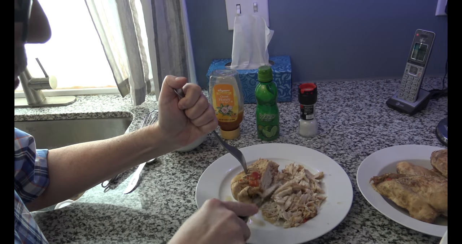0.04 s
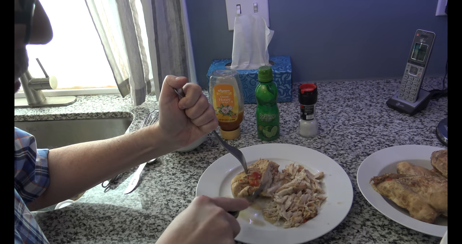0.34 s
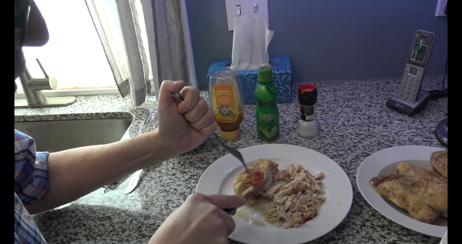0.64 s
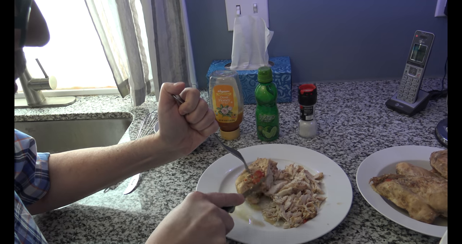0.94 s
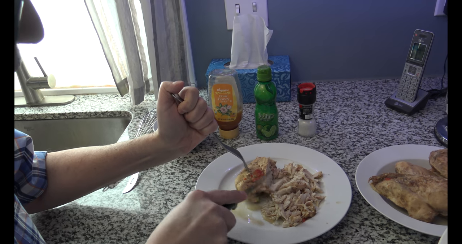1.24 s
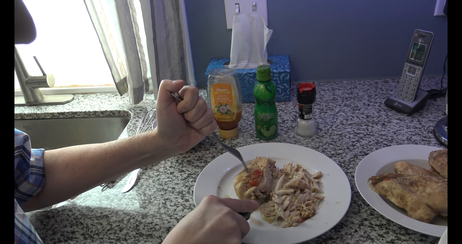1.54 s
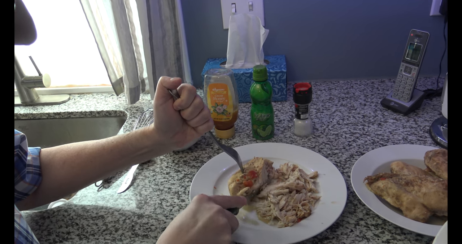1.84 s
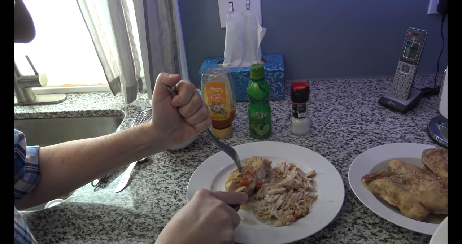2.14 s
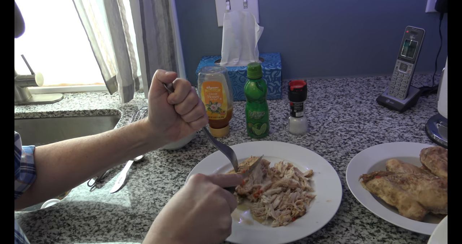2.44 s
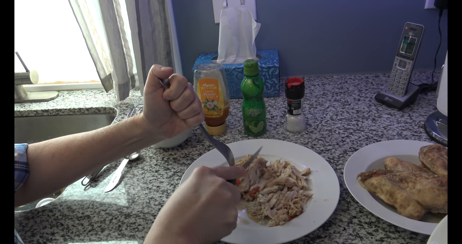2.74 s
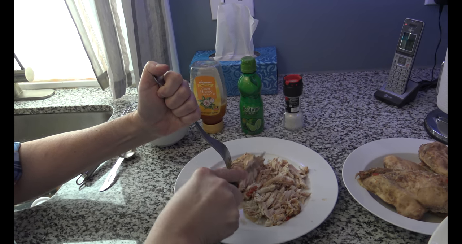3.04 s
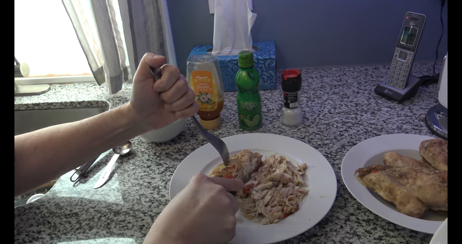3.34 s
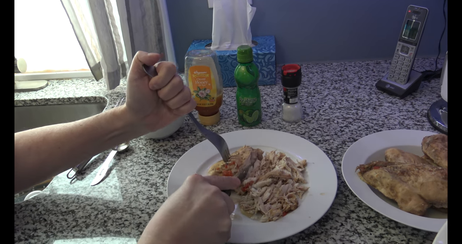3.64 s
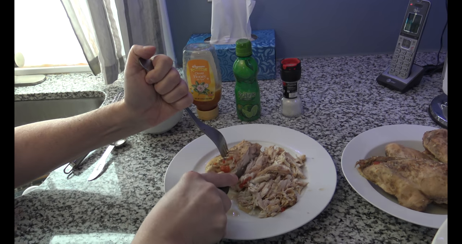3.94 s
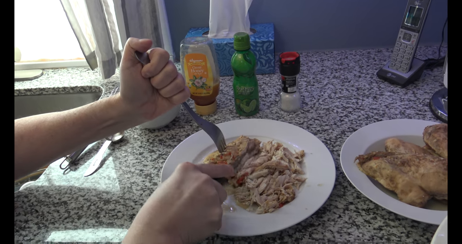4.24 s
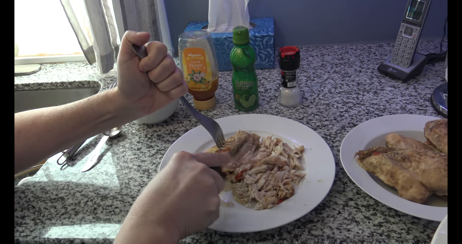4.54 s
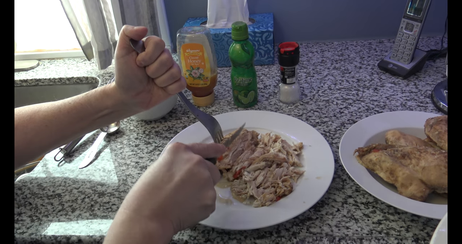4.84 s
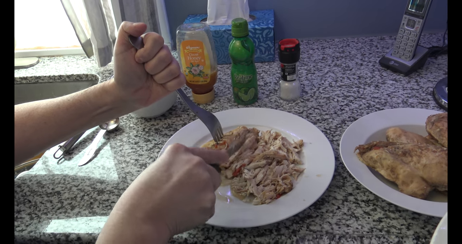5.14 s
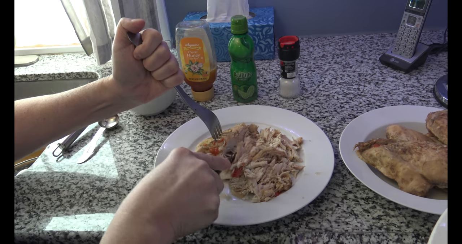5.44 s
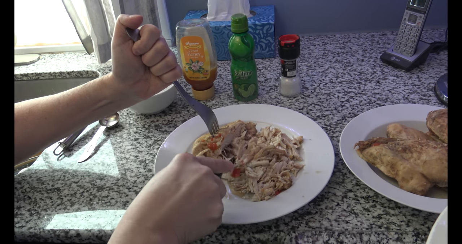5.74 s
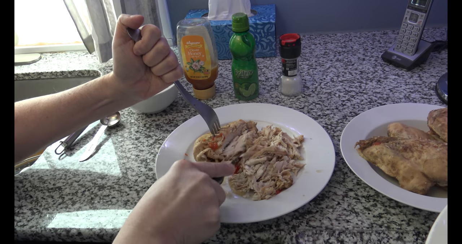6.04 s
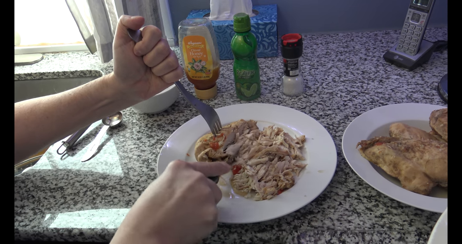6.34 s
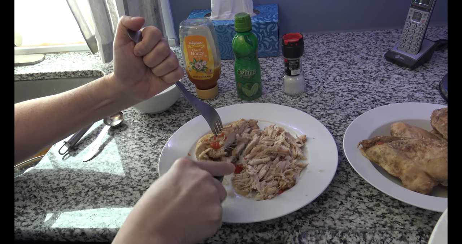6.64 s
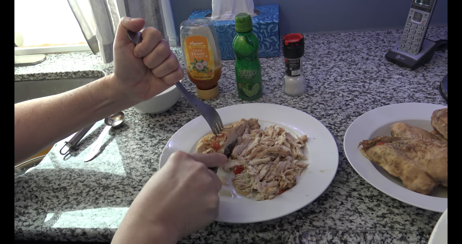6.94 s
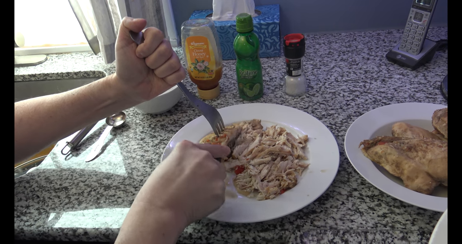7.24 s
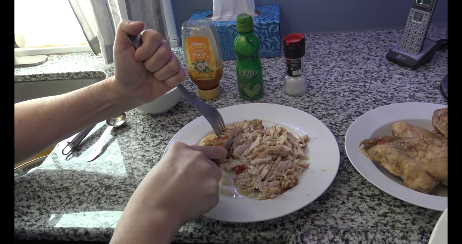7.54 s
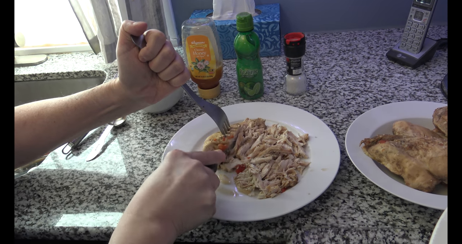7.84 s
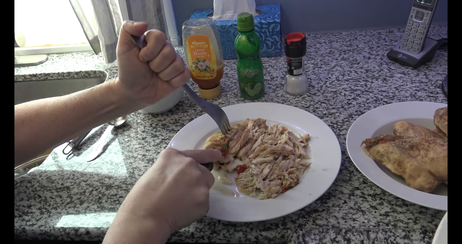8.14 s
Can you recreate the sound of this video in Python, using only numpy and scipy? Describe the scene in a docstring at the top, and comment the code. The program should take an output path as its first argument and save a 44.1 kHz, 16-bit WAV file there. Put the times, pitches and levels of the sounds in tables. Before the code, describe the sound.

Two steel forks clink and scrape on a china plate while pulling cooked chicken apart with a wet crackle, in a small kitchen.

```python
"""Sharp clinks, scrapes and a wet crackle: two steel forks pull cooked chicken apart on a china plate.
The fork tips ring as they hit the glaze, rasp as they slide, and once stick and slip in a squeal.
The meat tears in many tiny pops, and the plate knocks dully on the stone kitchen counter.
The small hard room echoes, with a few soft booms from leaning arms, a faint hiss and a low rumble."""
import sys
import numpy as np
from scipy import signal
from scipy.fft import rfft, irfft
from scipy.io import wavfile

SR = 44100
rng = np.random.default_rng(int(sys.argv[2]) if len(sys.argv) > 2 else 0)


def unload_wav(signal):
    """Save mono or channel-first audio to the path in sys.argv[1] as 16-bit WAV at rate SR, clipped to [-1, 1]."""
    wavfile.write(
        sys.argv[1],
        SR,
        np.round(np.clip(np.atleast_2d(signal).T, -1, 1) * 32767).astype(np.int16),
    )


N = 360914

# How the plate rings on the counter. Each row: pitch in Hz, width in Hz (wider dies sooner), level in dB.
PLATE_RINGS = [(192, 190, -12.5), (315, 90, -6.5), (459.3, 38, 1.5), (680, 100, -10.5), (948, 132, -4.5),
               (1216, 110, -5), (1310, 65, -11), (1700, 160, -13), (2050, 310, -18)]


def clinks(chatter=0.22, chatter_s=0.005, crack=0.03):
    """A fork tip lands and chatters briefly. Returns the direct sound and the part sent to the room."""
    # Each row: start in seconds, level in dB, pulling fork's share from 0 to 1, treble in dB,
    # relative echo level in dB.
    hits = [(0.1194, -26.5, 0, -3, -5), (0.4513, -17, 0.02, 0.5, -9.5), (.5327, -31, 0.1, 4, -21),
            (0.7553, -31.5, 0, 1, -7.5), (1.0614, -11, 0, 0.5, -6), (1.4126, -34.5, 0.27, 5.5, -2.5),
            (1.8383, -16.5, 0.05, 1.5, -13), (2.1948, -31, 0.5, -4, -11), (2.5851, -11.5, 0.77, 1, -7.5),
            (2.9205, -11.5, 0.63, 3, -4.5), (3.278, -13.5, 0.72, 4, -9), (5.7899, -22, 0.54, -6.5, -13),
            (6.0125, -27.5, 0.1, -11.5, -6.5), (6.3567, -31, 0.13, -8, -12),
            (6.6424, -21.5, 0.38, -2.5, -11), (6.9636, -39, 0.7, -15, -12), (7.4523, -27, 1, -29, -3.5),
            (7.4682, -28, 0.74, -18, -10.5), (7.7126, -26.5, 0.4, -21, -8), (7.8004, -23.5, 0.94, -36, 0),
            (7.9265, -28, 0.84, -28, -12)]
    direct, to_room, t = np.zeros(N), np.zeros(N), np.arange(SR // 8) / SR
    for start, db, pulling, treble_db, room_db in hits:
        force = (t == 0) + chatter * rng.standard_normal(len(t)) * np.exp(-t / chatter_s)
        clink = fork_ring(force, pulling, treble_db) + crack * treble(cut(force, 700, "high"), treble_db)
        top_hz = 16000 * amp(0.47 * (db + 2.5) / 3)   # a lighter blow touches longer and sounds duller
        clink = set_hit_level(cut(clink, top_hz, "low", order=3), db)
        add(direct, start, clink)
        add(to_room, start, amp(room_db - 3) * clink)
    return direct, to_room


def fork_ring(force, pulling, treble_db, damping=1, corner_hz=4600):
    """A touch rings fork and plate; each spot on the plate sounds a little different."""
    # Steel on china. Each row: pitch in Hz, width in Hz, dB for the holding fork, dB for the pulling fork.
    steel_rings = [(1453, 159, 3.5, -4.5), (1932, 313, -1.5, 0), (2783, 480, -8, -2.5), (3599, 59, 10, -3),
                   (4080, 370, -14, -5), (5846, 210, 0, -3.5), (6230, 200, -5, -10), (7380, 400, -11.5, -9),
                   (7900, 430, -8.5, -3.5), (8610, 550, -5.5, -4), (9940, 150, -8, -12),
                   (10500, 310, -13.5, -16), (11580, 420, -14.5, -14.5), (12800, 600, -9.5, -14.5),
                   (13550, 310, -18.5, -16), (15100, 580, -24, -18)]
    hz, width, holding_db, pulling_db = np.transpose(steel_rings)
    spot_db = 0.3 * rng.standard_normal(len(hz))
    db = holding_db + np.clip(pulling, 0, 1) * (pulling_db - holding_db) + spot_db
    ringing = resonate(force, zip(hz, width, db), damping)
    return treble(cut(ringing, 880, "high", order=3), treble_db, corner_hz)


def scrapes(lift_s=.023, damping=.7):
    """Tiny slips on the glaze swell as the fork presses down and fade as it lifts."""
    # Each row: time of the peak in seconds, rise time in seconds, relative level in dB,
    # pulling fork's share from 0 to 1, treble in dB.
    slides = [(.16, .025, -37, 0.4, -1), (.53, 0.026, -33, .44, -12), (1.374, 0.026, -43.5, 0.2, -4),
              (1.601, 0.038, -24, 0, 0.5), (2.343, 0.04, -21.5, 0.26, 3), (3.42, 0.08, -36, 0.5, 6),
              (3.56, 0.072, -37, 0.45, -18), (3.958, 0.022, -43, 0.1, -7), (4.087, 0.087, -29, 0.65, 2),
              (4.736, 0.068, -31.5, 0.57, 9), (5.445, 0.065, -40, 0.7, -17), (5.52, .013, -44.5, 1, -17),
              (5.77, .14, -34.5, 0.58, -2.5), (5.787, .016, -24, 0.65, 2), (6.066, 0.073, -29.5, 0.43, 2.5),
              (6.097, .034, -29.5, 0.53, -5.5), (7.376, .014, -37.5, .4, -17), (7.718, .027, -26, .94, -23),
              (7.842, .028, -30.5, 0.3, -4)]
    out = np.zeros(N)
    for peak, rise, db, pulling, treble_db in slides:
        t = np.arange(-2 * rise, 2 * lift_s, 1 / SR)
        slips = clicks(len(t), per_s=3600, spread_db=1.5) * amp(3 * waver(len(t), 150))
        pressure = amp(-17 * np.maximum(-t / rise, t / lift_s) ** 1.68)
        # bare tips brighten only the very top; meat on them dulls all but the lowest tones
        steel = fork_ring(slips, pulling, treble_db, damping, corner_hz=7000 if treble_db > 0 else 4400)
        plate = cut(resonate(slips, PLATE_RINGS, damping), 600, "low")
        rasp = cut(steel, 9800, "low", order=3) + amp(-7) * plate
        add(out, peak + t[0], amp(db - 2.5) * pressure * unit(rasp))
    return out


def tearing_meat(thin_snap_s=0.0026, thick_snap_s=0.0057):
    """Wet fibres part in clumps of tiny pops, with louder snaps and a soft squelch through the plate."""
    # A fork drags through meat. Each row: start and length in seconds, relative level and swell in dB.
    tears = [(0.704, 0.049, -52, 4), (1.035, 0.014, -38, 4), (1.374, 0.044, -49, 14.5),
             (1.778, 0.019, -52, 7), (2.121, 0.084, -48.5, 4), (2.528, 0.026, -59.5, 2),
             (2.873, 0.04, -49.5, 24), (3.209, 0.042, -54, 14), (3.585, 0.2, -59.5, 1.5),
             (3.905, 0.056, -53.5, 9.5), (4.235, 0.18, -53.5, -6), (4.573, 0.063, -49, 17.5),
             (4.917, 0.28, -52.5, -4.5), (5.29, 0.24, -53, -2.5), (6.302, 0.057, -44, -7),
             (6.382, 0.082, -56.5, -3), (6.593, 0.032, -44.5, -9), (6.9, 0.043, -46, 4),
             (7.0, 0.044, -52.5, 1), (7.201, .19, -50.5, -5.5), (7.511, 0.044, -39.5, 0),
             (7.608, 0.12, -47, 2), (7.883, .1, -49.5, -2), (8.121, 0.077, -44, 5)]
    # The thickest fibres break. Each row: start in seconds, relative level in dB.
    thick_snaps = [(.412, -32.5), (0.7419, -32.5), (1.8123, -21.5), (2.158, -20.5), (2.183, -27.5),
                   (3.5888, -27.5), (4.6403, -18), (5.4712, -27), (5.6477, -20.5), (6.598, -29),
                   (6.9358, -16.5), (7.5229, -24), (7.5514, -18), (8.1247, -18.5), (8.1703, -22.5)]
    # The tone of the crackle. Each row: frequency in Hz, relative level in dB.
    crackle_tone = [(410, -29), (700, -6), (1460, -6.5), (3320, -5.5), (3600, -7), (7890, -4), (10500, -12),
                    (13700, -10.5), (16000, -26)]
    pull = np.zeros(N)
    for start, length, db, swell_db in tears:
        _, envelope = stroke(length, swell_db, attack_s=.01, release_s=.011)
        add(pull, start, amp(db - 1) * envelope)
    pops = unit(sum(resonate(clicks(N, per_s=420, spread_db=3.6), [(hz, hz / 7, 0)])
                    for hz in np.geomspace(1000, 15000, 16)))
    t = np.arange(SR // 40) / SR
    thin_fades = signal.fftconvolve(clicks(N, per_s=36, spread_db=1), np.exp(-t / thin_snap_s))[:N]
    thin_snaps = unit(thin_fades * rng.standard_normal(N))
    clumps = amp(3 * waver(N, 49) + 1.2 * waver(N, 14))
    force = pull * (unit(pops * clumps) + amp(-9) * thin_snaps)
    for start, db in thick_snaps:
        add(force, start, amp(db - 11) * rng.standard_normal(len(t)) * np.exp(-t / thick_snap_s))
    crackle = cut(shape_tone(force, crackle_tone), 500, "high")
    squelch = cut(resonate(force, PLATE_RINGS), 650, "low")
    return crackle + amp(4) * squelch


def squeal():
    """A fork tip sticks and slips. When rough, every other slip differs, adding a tone an octave down."""
    # Each row: start and length in seconds, relative level and swell in dB, pitch and glide in Hz,
    # roughness from 0 to 1.
    squeaks = [(7.691, 0.091, -34, -5, 1850, -230, 0.67), (7.798, 0.064, -25.5, -2.5, 1652, 160, 0.82),
               (7.866, 0.016, -7, -7, 1884, -34, .02), (7.885, 0.075, -32.5, -14, 1902, -21, 0.17)]
    out = np.zeros(N)
    for start, length, db, swell_db, hz, glide_hz, rough in squeaks:
        t, envelope = stroke(length, swell_db, attack_s=.004, release_s=.003)
        wobble = 0.027 * (rough + 0.12) * waver(len(t), 670) + 0.017 * rough * waver(len(t), 50)
        pitch = (hz + glide_hz * np.minimum(t / length, 1)) * (1 + wobble)
        phase = 2 * np.pi * np.cumsum(pitch) / SR
        # Each pair: multiple of the pitch, strength.
        partials = [(.5, rough * amp(-5)), (1, 1), (1.5, rough * amp(-4.5)), (2, amp(-32))]
        tone = sum(gain * amp(3 * rough * waver(len(t), 40)) * np.sin(k * phase) for k, gain in partials)
        judder_db = 5 * rough * waver(len(t), 220)
        add(out, start, np.sqrt(2) * amp(db - 2 + judder_db) * envelope * tone)
    return out


def plate_knocks(rattle_rise_s=0.0012, rattle_fade_s=0.0095):
    """The plate tips onto the ring under its base: a soft landing, then a brief rattle."""
    # Each row: start in seconds, level in dB.
    landings = [(.118, -31), (.442, -33.5), (1.063, -39), (1.838, -42.5), (2.159, -34), (2.43, -45.5),
                (2.564, -40.5), (2.924, -31.5), (3.156, -37.5), (3.279, -34), (3.534, -40), (3.563, -36.5),
                (5.973, -49.5), (6.261, -36), (6.618, -40.5), (7.291, -38.5), (7.325, -33), (7.454, -35),
                (7.473, -32.5), (7.556, -29), (7.699, -38), (7.802, -34), (7.925, -30)]
    out, t = np.zeros(N), np.arange(SR // 5) / SR
    envelope = (1 - np.exp(-t / rattle_rise_s)) * np.exp(-t / rattle_fade_s)
    for start, db in landings:
        rattle = 0.23 * rng.standard_normal(len(t)) * envelope
        knock = resonate(2 * (t == 0) + rattle, PLATE_RINGS, damping=.9)
        add(out, start, set_hit_level(cut(knock, 2300, "low", order=3), db))
    return out


def counter_booms(swell_s=0.041, width_hz=22):
    """Arms lean on the counter, and the slow push makes it boom briefly."""
    # Each row: time of the peak in seconds, level in dB, pitch in Hz.
    leans = [(4.736, -34.5, 58), (5.211, -39.5, 60.4), (8.16, -31.5, 29.8)]
    out, t = np.zeros(N), np.arange(-SR // 4, SR // 4) / SR
    for peak, db, hz in leans:
        boom = unit(cut(resonate(rng.standard_normal(len(t)), [(hz, width_hz, 0)]), 123, "low"))
        add(out, peak + t[0], amp(db) * boom * np.exp(-(t / swell_s) ** 2))
    return out


def kitchen_echo(x, build_s=0.0041):
    """Reflections from the hard room build up quickly, and the high ones die first."""
    # Each row: frequency in Hz, seconds the echo takes to fade by 60 dB.
    fade_times = [(200, 1), (500, 0.42), (1800, .40), (4000, 0.34), (8000, 0.34), (15000, 0.24)]
    t, echo = np.arange(SR // 2) / SR, 0
    edges_hz = np.geomspace(120, 17000, 9)
    for low, high in zip(edges_hz, edges_hz[1:]):
        band_filter = signal.butter(3, [low, high], "band", fs=SR, output="sos")
        band = signal.sosfilt(band_filter, rng.standard_normal(len(t)))
        echo = echo + band * amp(-60 * t / at_hz(fade_times, np.sqrt(low * high)))
    build_up = (1 - np.exp(-t / build_s)) ** 2
    return signal.fftconvolve(x, unit(echo * build_up) / np.sqrt(len(t)))[:N]


def background(hiss_rise_db_per_s=1.15, rumble_rise_db_per_s=1.61):
    """A faint hiss and a wavering low rumble, both slowly growing."""
    # The tone of each noise. Each row: frequency in Hz, relative level in dB.
    hiss_tone = [(76, -23.5), (130, -11.5), (356, -19), (462, -13.5), (735, -21.5), (994, -22.5),
                 (1220, -24), (3530, -30.5), (4150, -31), (16000, -41.5)]
    rumble_tone = [(8.8, -34), (15, 11), (30, -5.5), (67, -8), (156, -25), (260, -26), (340, -28.5),
                   (570, -120)]
    t = np.arange(N) / SR
    hiss_db = -58.5 + hiss_rise_db_per_s * (t - t.mean())
    hiss = amp(hiss_db) * shape_tone(rng.standard_normal(N), hiss_tone)
    rumble_db = -50 + rumble_rise_db_per_s * t + 1.5 * waver(N, 8.9)
    return hiss + amp(rumble_db) * shape_tone(rng.standard_normal(N), rumble_tone)


def resonate(force, rings, damping=1):
    """Ring an object: add up its fading tones, flipping every other one upside down."""
    out = 0
    for k, (hz, width, db) in enumerate(rings):
        r = np.exp(-np.pi * width * damping / SR)
        feedback = [1, -2 * r * np.cos(2 * np.pi * hz / SR), r * r]
        tone = signal.lfilter([(1 - r * r) / 2, 0, (r * r - 1) / 2], feedback, force + 1e-18)
        out = out + (-1) ** k * amp(db) * tone
    return out


def stroke(length, swell_db, attack_s, release_s):
    """Times and loudness curve of one fork push: it rises, swells or sags, then fades."""
    t = np.arange(0, length + 6 * release_s, 1 / SR)
    hold = amp(swell_db * (np.minimum(t / length, 1) - .5))
    return t, np.minimum(t / attack_s, 1) * hold * np.exp(-np.maximum(t - length, 0) / release_s)


def clicks(size, per_s, spread_db):
    """Random clicks of uneven strength."""
    count, out = int(size * per_s / SR) + 1, np.zeros(size)
    strengths = amp(spread_db * np.minimum(rng.exponential(1, count), 4))
    out[rng.integers(0, size, count)] = strengths * rng.choice([-1, 1], count)
    return unit(out)


def waver(size, rate_hz):
    """A smooth random wobble of typical size 1."""
    return unit(cut(rng.standard_normal(size + SR // 10), rate_hz, "low")[-size:])


def treble(x, gain_db, corner_hz=4700):
    """Turn the treble up or down: a bare fork tip is bright, one padded by meat is dull."""
    a = amp(gain_db / 2)
    k = np.sqrt(2 * a)
    shelf = signal.bilinear([a * a, a * k, a], [1, k, a], .5 / np.tan(np.pi * corner_hz / SR))
    return signal.lfilter(*shelf, x)


def cut(x, hz, keep, order=2):
    """Keep the "low" or the "high" side of a frequency."""
    return signal.sosfilt(signal.butter(order, min(hz, .45 * SR), keep, fs=SR, output="sos"), x)


def shape_tone(x, tone):
    """Make frequencies louder or softer by a table; white noise keeps its power."""
    hz = np.arange(len(x) // 2 + 1) * SR / len(x)
    return irfft(rfft(x) * unit(amp(at_hz(tone, hz))), len(x))


def at_hz(table, hz):
    """Read between a table's rows, with octaves evenly spaced."""
    row_hz, value = np.transpose(table)
    return np.interp(np.log(hz + 1e-3), np.log(row_hz), value)


def set_hit_level(x, db):
    """Scale a hit so its first hundredth of a second has this level."""
    return x * amp(db) / np.sqrt(np.mean(x[:SR // 100] ** 2))


def amp(db):
    """Turn decibels into a multiplier."""
    return 10 ** (np.asarray(db) / 20)


def unit(x):
    """Scale to an average (rms) level of 1."""
    return x / np.sqrt(np.mean(x ** 2) + 1e-20)


def add(out, start_s, x):
    """Mix a sound in at a given time."""
    i = max(int(start_s * SR), 0)
    out[i:i + len(x)] += x[:N - i]


def scene():
    """Everything on the plate is heard directly and as an echo, over the booms and background."""
    clink, clink_to_room = clinks()
    scrape, knock, tear, squeak = scrapes(), plate_knocks(), tearing_meat(), squeal()
    room = kitchen_echo(clink_to_room + amp(-15.5) * scrape + amp(-9.5) * knock
                        + amp(-10.5) * tear + amp(-14.5) * squeak)
    return (clink + scrape + knock + tear + squeak + room + counter_booms() + background())[None]


def record(dry, ceiling=.95, cutoff_hz=16500):
    """Round off the loudest peaks and remove the very highest treble."""
    rounded = dry / (1 + (dry / ceiling) ** 4) ** .25
    return signal.sosfilt(signal.ellip(10, .1, 90, cutoff_hz, fs=SR, output="sos"), rounded)


dry = scene()
out = record(dry)
unload_wav(out)
```